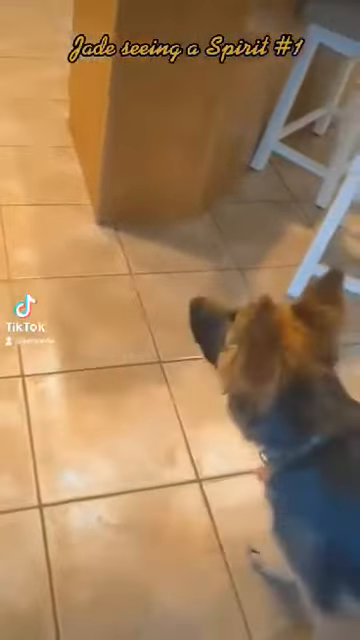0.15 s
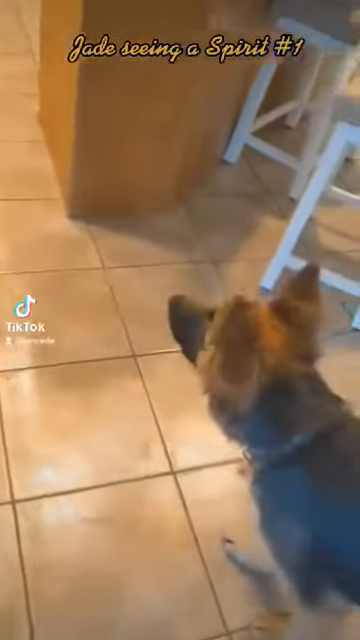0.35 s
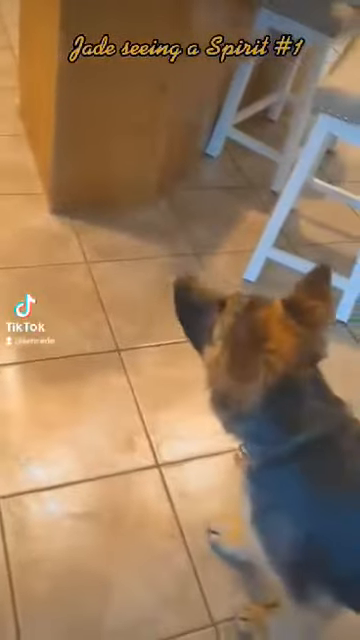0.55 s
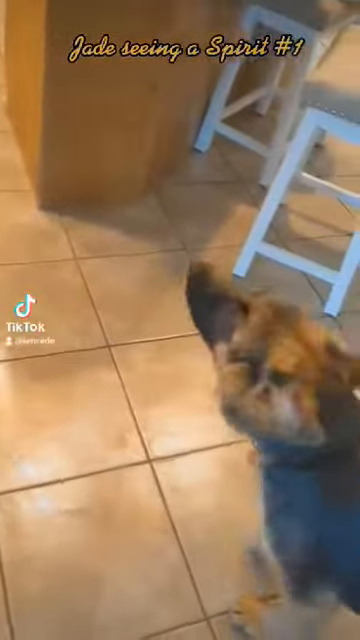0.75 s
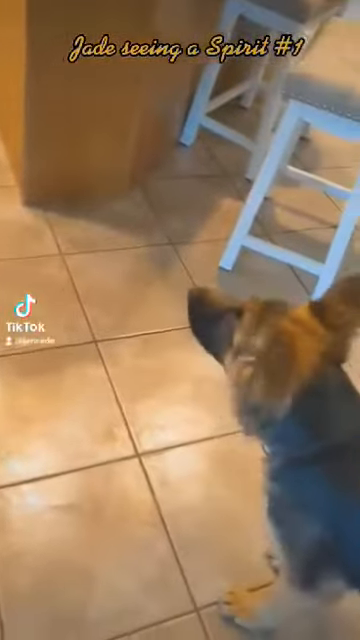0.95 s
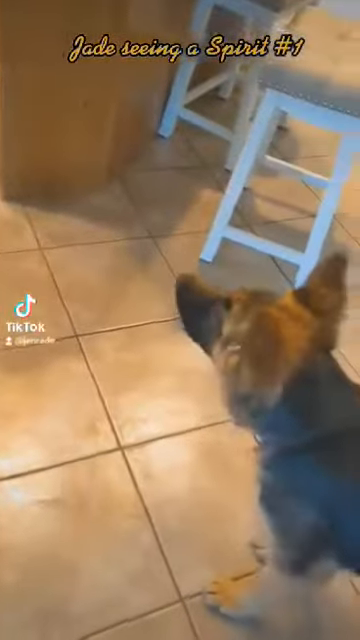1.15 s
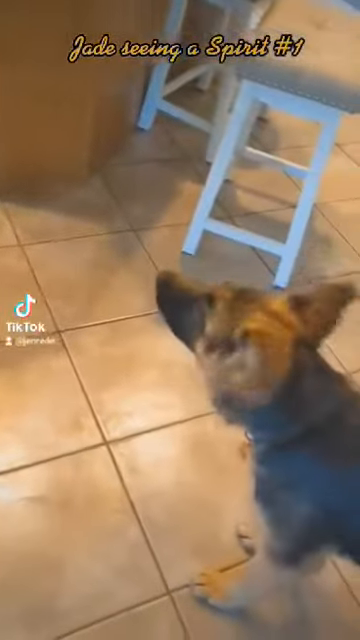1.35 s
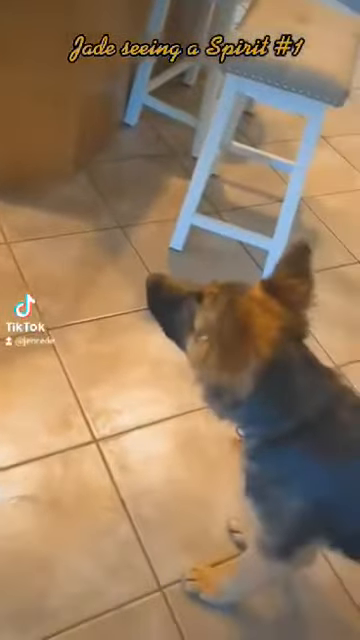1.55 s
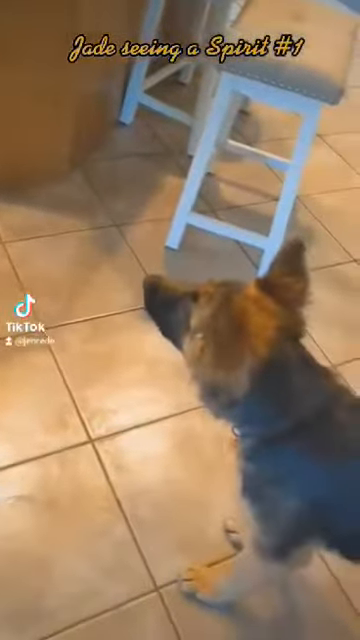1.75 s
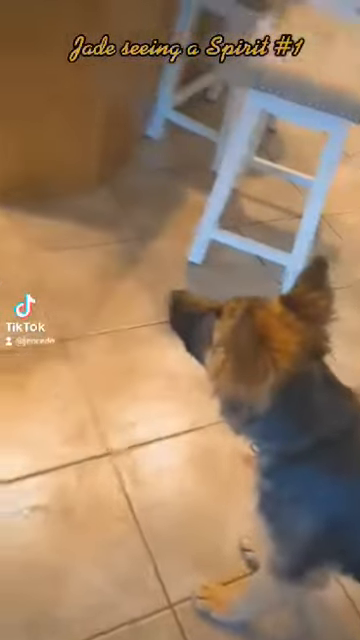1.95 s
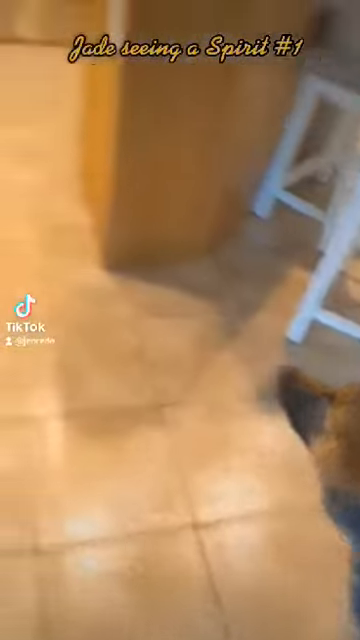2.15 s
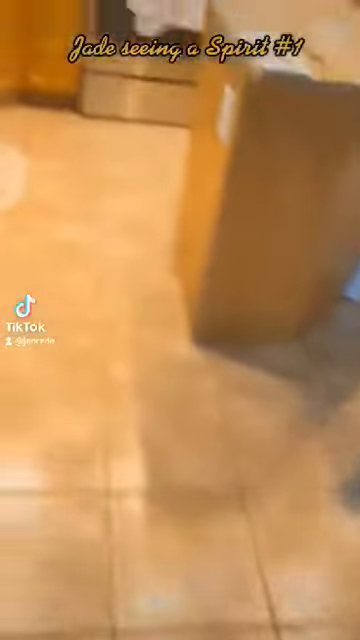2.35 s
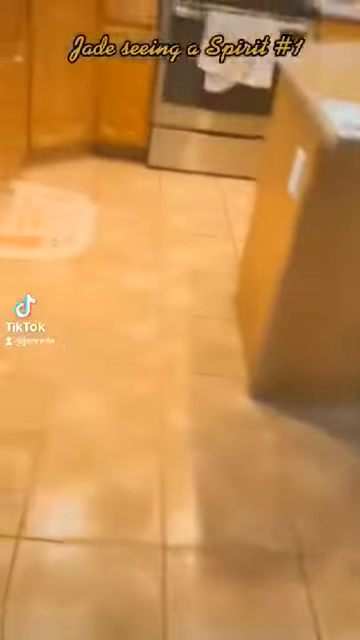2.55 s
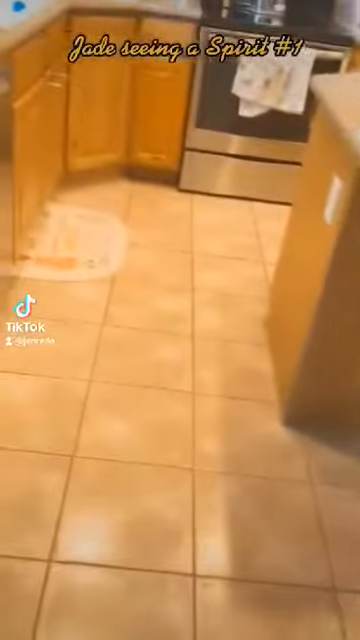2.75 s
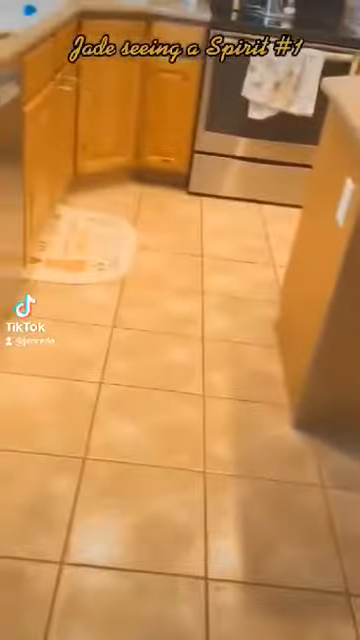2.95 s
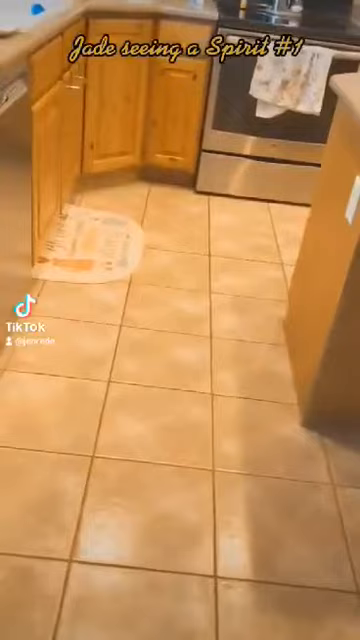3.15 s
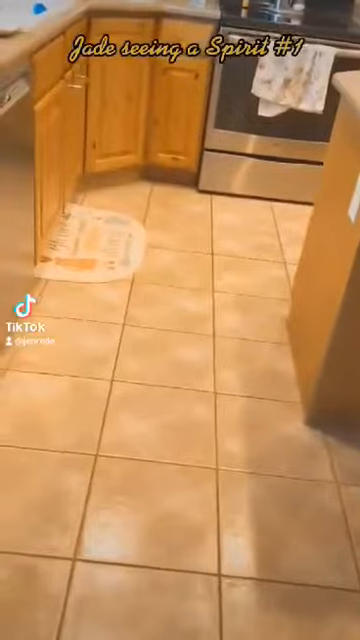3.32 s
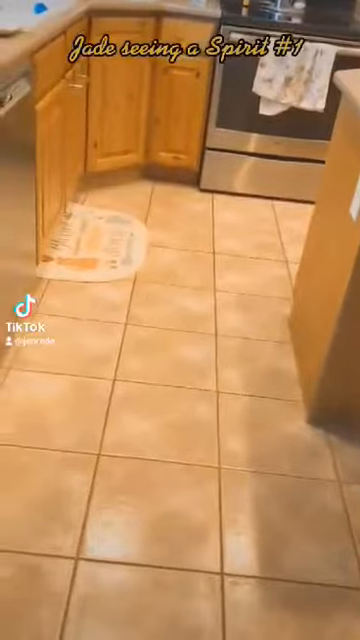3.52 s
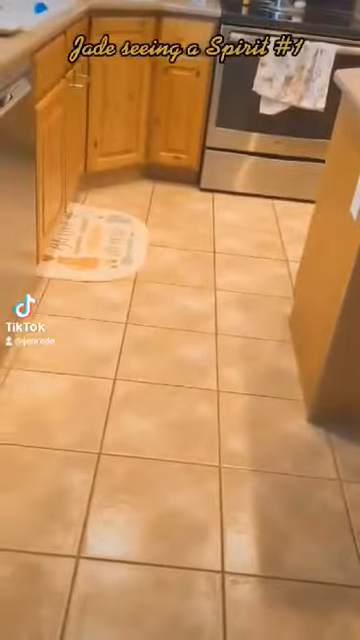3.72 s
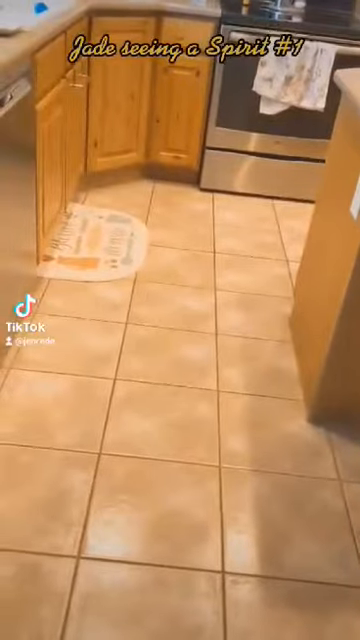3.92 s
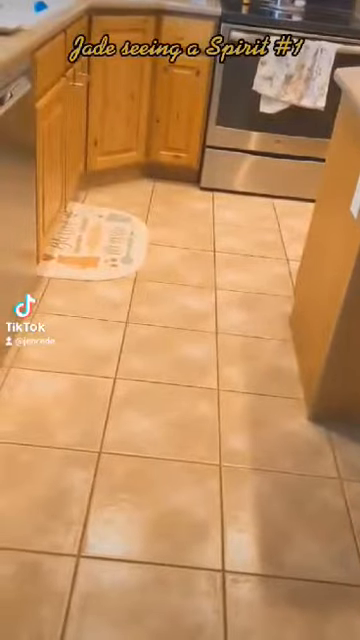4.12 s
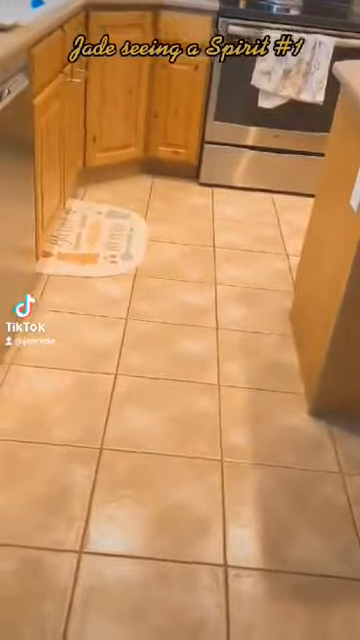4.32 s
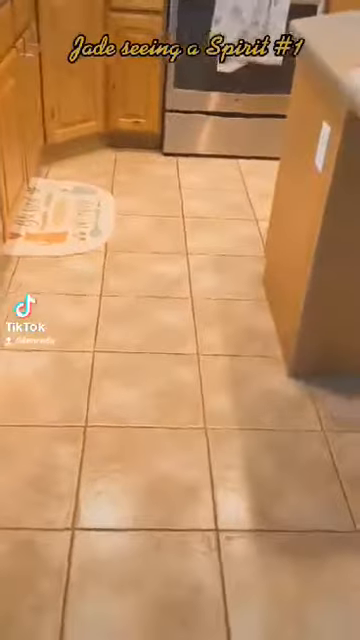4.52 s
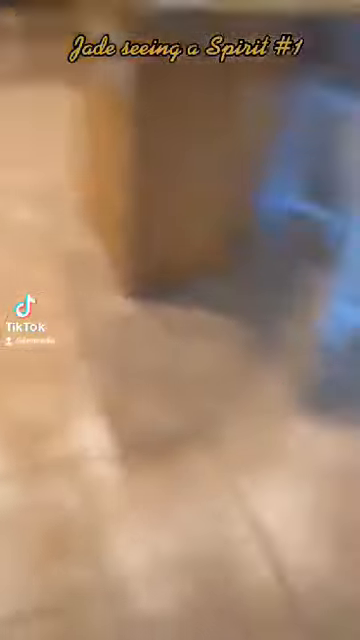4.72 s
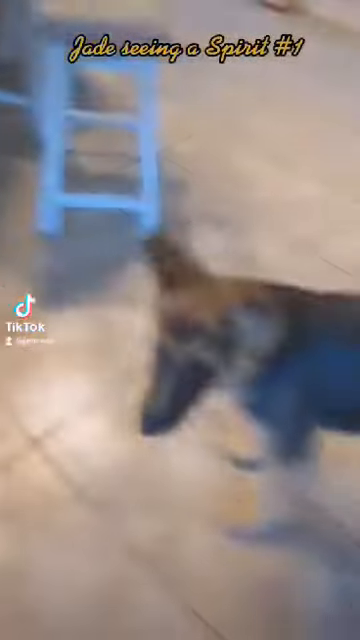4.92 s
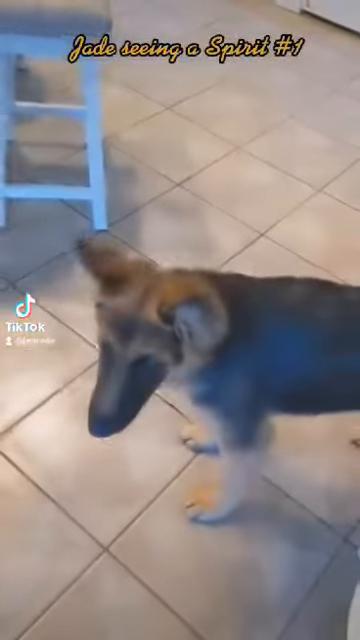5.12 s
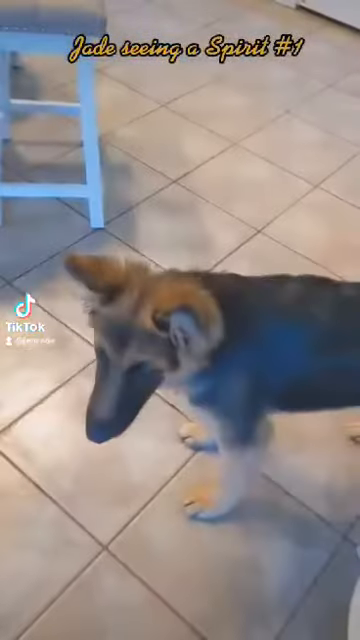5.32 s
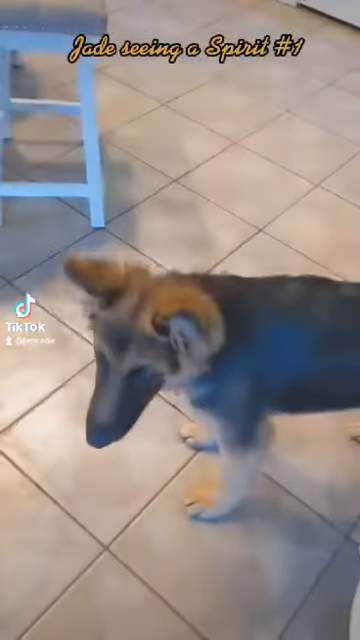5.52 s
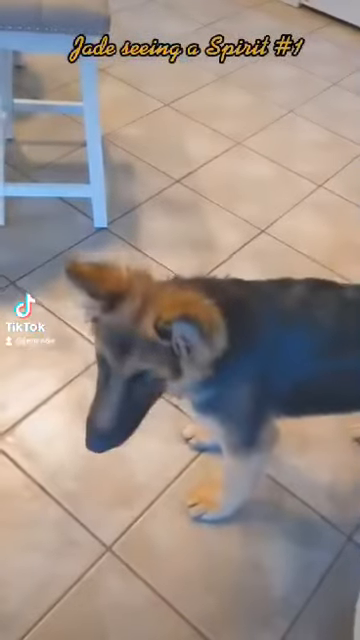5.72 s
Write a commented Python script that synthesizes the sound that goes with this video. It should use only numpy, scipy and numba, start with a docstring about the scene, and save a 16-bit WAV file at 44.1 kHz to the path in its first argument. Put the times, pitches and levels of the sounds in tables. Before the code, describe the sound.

A young shepherd dog a step from a phone microphone barks in a hard tiled kitchen. A quick double bark opens, soft paw steps follow, then come two pairs of loud barks with gruff growls trailing off. A lower bark and a closed-mouth growl follow around three seconds, then a last shrill yap after a pause. Bright echoes swell after the loud barks, then only quiet room air and a faint drone remain.

```python
"""Seven barks of a young shepherd dog, the first a double one, ring in a tiled kitchen a step from a phone.
Each bark is a sum of vocal-fold harmonics that swoops up; it is clear at the crest and rough on either side.
Growls are slower folds behind the muzzle; paws, hisses and a rustle are shaped noise over room air and a drone.
The phone's limiter ducks the loud barks and lets the echo swell back."""
import sys
import numpy as np
from scipy import signal
from scipy.fft import rfft, irfft, next_fast_len
from scipy.io import wavfile
from scipy.ndimage import uniform_filter1d, minimum_filter1d, map_coordinates
from numba import njit

SR = 44100
rng = np.random.default_rng(int(sys.argv[2]) if len(sys.argv) > 2 else 0)


def wav_record(signal):
    """Record a signal, one row per channel, as 16-bit PCM in the file named by sys.argv[1]."""
    frames = np.transpose(np.atleast_2d(signal))
    bounded = np.clip(frames, -1, 1)
    # unit amplitude maps onto the largest positive 16-bit level
    quanta = np.round(bounded * 32767).astype(np.int16)
    wavfile.write(sys.argv[1], SR, quanta)


N = 258867
LEAD_SAMPLES = SR // 8  # the first bark is already under way at time zero
T = np.arange(-LEAD_SAMPLES, N) / SR
TOP_HZ = 13300

# Barks. Each row: start in seconds, swoop in seconds, hold in seconds, die-away in seconds, top pitch in Hz,
# level in dB, mouth opening in the swoop, mouth opening at the crest (0 woof, 1 yap, more a shriller yelp),
# overtone edge in dB, roughness at the crest 0-1, treble toward the phone in dB, lead of the left port in ms.
BARKS = [ (-.075, 0.064, .04, 0.054, 494.7, -19.5, 0.59, 0.12, -2, 0.4, 0, -0.011),
         (.028, .042, .024, 0.025, 484.8, -19, 1.2, .03, 1, .33, 0.5, -0.097),
         (0.753, 0.071, 0.0093, .04, 499.3, 1, 1.02, 0.54, -3, 0.15, -1.5, 0.091),
         (1.26, .052, .004, .14, 451.7, -3, 0.25, 0.52, -2.5, 0.25, 0, -0.069),
         (2.401, .074, 0.0091, 0.045, 496.2, 3, 1.02, 0.44, 1, 0.16, -1, 0.044),
         (2.719, 0.053, .006, 0.14, 460, -3.5, 0.48, 0.28, 0.5, 0.19, -1, 0.16),
         (3.5, .042, .024, 0.051, 452.3, -4, .15, 0, 6.5, 0.34, 0, 0.1),
         (4.634, 0.034, .024, 0.019, 487.6, -8, 1.64, 1.26, -6.5, 0.075, 6, 0.19)]
# Growls that trail off a bark or wind up to the next. Each row: start in seconds, swell in seconds,
# fade in seconds, first pitch in Hz, last pitch in Hz, level at the crest in dB, lips parted 0-1, roughness 0-1.
GROWLS = [ (0.892, 0.15, .11, 152.5, 72.3, -39.5, 1, .7),
          (1.109, 0.091, 0.14, 86.6, 115.2, -31.5, 0.63, .22),
          (1.406, 0.044, .11, 172, 109.2, -31, 0.36, .4), (2.551, 0.049, 0.089, 161.4, 117, -26, 0.97, .35),
          (2.66, 0.072, 0.01, 113.3, 153, -29.5, 0.8, .15), (2.818, 0.09, 0.14, 204.4, 100, -33, 0.95, .4),
          (4.548, .04, .045, 109.5, 166, -38.5, 0.93, 1),
          (4.596, 0.0342, 0.0241, 173.5, 411, -24, 0.98, 0.37)]
# Long growl with the mouth shut. Each row: time in seconds, pitch in Hz, level in dB before HUM_TRIM_DB.
HUM = [(2.97, 100.3, -33), (2.994, 103.5, -31), (3.024, 97.1, -33), (3.164, 99.7, -28), (3.214, 106, -27.5),
       (3.278, 106, -33.5), (3.398, 102.8, -27), (3.452, 102, -29.5), (3.485, 105.5, -35)]
# Throat of a bark, lips nearly shut, then jaws wide. Each row: frequency in Hz, relative gain in dB.
WOOF_THROAT = [(100, -14.5), (250, 15.5), (440, -2), (650, -10), (950, -13), (1350, -21), (1850, -23.5),
               (2300, -42), (3000, -42), (4300, -55.5), (6500, -39), (9500, -56.5), (13000, -61.5)]
YAP_THROAT = [(100, -30), (250, -5.5), (440, -6), (720, -2.5), (880, -7.5), (1050, 0), (1350, -11.5),
              (1850, -10), (2300, -24), (3000, -31), (4300, -44), (6500, -28.5), (9500, -47.5),
              (13000, -52)]
# Throat of a growl, muzzle closed, then lips parted. Each row: frequency in Hz, relative gain in dB.
MUZZLE = [(60, -20.5), (104, -19.5), (140, -10), (208, 9), (305, -6.5), (420, -27), (570, -42.5),
          (860, -28), (1150, -48), (2500, -53.5), (6000, -72)]
SNARL = [(60, -17.5), (95, -6.5), (140, -4), (205, -10), (295, 0), (430, -11.5), (600, -16.5), (900, -20.5),
         (1400, -25.5), (2500, -51.5), (6000, -62)]
# Air torn at the folds in a bark, then in a growl. Each row: frequency in Hz, relative density in dB per Hz.
RASP = [(30, -62.5), (130, -25), (350, -18), (600, -7.5), (850, 8.5), (1300, 0), (1850, -0.5), (2300, -18),
        (3500, -19), (4400, -39), (5200, -22), (7200, -18), (8400, -26.5), (9500, -38.5), (12800, -37)]
GRUFF = [(30, -49.5), (90, -13.5), (200, 0), (420, -1), (650, -4.5), (900, -14), (1500, -26.5),
         (6000, -43.5)]
# Paws on the tiles. Each row: start in seconds, pad thud in dB and claw in dB (noise before its envelope),
# claw slide (decay time) in seconds.
STEPS = [(.28, -58.5, -51, 0.022), (.485, -42, -74, .01), (0.537, -47, -36, 0.0064),
         (0.669, -38, -48, 0.0063), (3.186, -63.5, -59.5, 0.047), (3.921, -68.5, -60, 0.032),
         (4.073, -65, -65, 0.019)]
# Air hissing through the muzzle as a bark winds up. Each row: start in seconds, end in seconds, end level in dB.
PUFFS = [(0.626, 0.733, -54.5), (2.279, 2.403, -44.5), (4.609, 4.666, -41.5)]
# Spectrum of that hiss. Each row: frequency in Hz, relative density in dB per Hz.
PUFF_SPECTRUM = [(40, -43.5), (200, 2), (900, 0), (2000, 2), (3200, 0), (5000, -2), (8000, -3),
                 (12500, -11)]
# Soft rustle as the dog settles. One row: start in seconds, end in seconds, peak level in dB.
RUSTLE_SWELL = (5.07, 5.43, -69)
# Spectrum of the rustle. Each row: frequency in Hz, relative density in dB per Hz.
RUSTLE_SPECTRUM = [(150, -1), (700, -2), (1300, 1), (2000, -9), (3300, -11), (5000, -26), (12000, -30)]
# Decay of the kitchen echo. Each row: frequency in Hz, t60 in seconds.
KITCHEN_T60 = [(150, 0.76), (480, 0.55), (1000, 0.5743), (2000, 0.6219), (5000, 0.5066), (11000, 0.42)]
# Colour of the kitchen echo. Each row: frequency in Hz, echo in dB.
KITCHEN_COLOUR = [(100, -6.5), (220, -9), (460, -4), (950, 0), (1600, -6), (3200, -2.5), (6500, -4.5),
                  (12000, -7.5)]
# Room air. Each row: frequency in Hz, relative density in dB per Hz.
AIR_SPECTRUM = [(15, -61), (25, -34.5), (36, -16.5), (59, -6), (203, -14.5), (325, -13), (400, -29.5),
                (433, -15), (625, -21.5), (1030, -23.5), (1730, -27.5), (2310, -33.5), (13000, -45)]
# Low appliance drone. Each row: time in seconds, level in dB.
DRONE_LEVEL = [(0, -59), (.5, -62.5), (1.9, -64.5), (2.3, -65.5), (4.1, -72), (4.5, -69), (5.7, -71.5),
               (5.8, -68), (5.85, -54.5)]

START_HZ, ONSET_DB, RELEASE_DB, SAG_S = 184.5, -34, -34.5, .15
SWELL_POWER, SWOOP_POWER = 2.196, 1.75  # the level arrives sooner than the pitch
RELEASE_POWER = 0.79  # the level drops fastest just after the crest
JAW_TURN = .66  # share of the swoop at which the jaws move
JAW_MOVE_S, SLACK_MOUTH = 0.012, 0.29  # the slack opening is that of a dying bark
BREAK_S = 0.027  # time for the voice to break once the crest is over
BREAK_DB = -17.5  # the voice is fully hoarse this far under its crest and below
ONSET_ROUGH, DYING_ROUGH = .75, .9
RASP_DB, GRUFF_DB = -2.5, 0.5  # relative to the tone, at full roughness
GROWL_ENDS_DB = -20  # start and end of a growl, under its crest
HUM_TRIM_DB, HUM_PARTED, HUM_ROUGH = 0.5, .1, 0.02
AIR_DB = -64


def bark(row, jitter=.07, shimmer=0.097, open_rasp_db=3):
    """The jaws blend a woof into a yap; roughness shakes pitch and strength and tears the air."""
    (start, swoop_s, hold_s, die_s, top_hz, db, swoop_mouth, crest_mouth,
     edge_db, crest_rough, facing_db, lead_ms) = row
    t, fade = span(start, start + swoop_s + hold_s + die_s)
    hz, effort_db, mouth, rough = bark_gesture(
        t - start, swoop_s, hold_s, die_s, top_hz, swoop_mouth, crest_mouth, crest_rough)

    def throat_db(f):
        """The blended throat, with the overtones above 1 kHz raised or lowered."""
        blended = (1 - mouth) * at(WOOF_THROAT, f) + mouth * at(YAP_THROAT, f)
        return blended + edge_db * np.clip((f - 1000) / 350, 0, 1)

    shaken_hz = hz * (1 + jitter * rough * wobble(t, 350))
    tone, gate = folds(shaken_hz, throat_db, count=30)
    tone = tone * (1 + shimmer * rough * wobble(t, 300))
    rasp = undb(RASP_DB + open_rasp_db * mouth) * rough * gate * noise(RASP, len(t))
    voice = undb(db + effort_db) * (tone + rasp)
    return t[0], fade * scatter(voice, facing_db, lead_ms)


def bark_gesture(age, swoop_s, hold_s, die_s, top_hz, swoop_mouth, crest_mouth, crest_rough):
    """Pitch, effort, mouth and roughness of one bark: the voice is clearest at full effort."""
    to_go = np.clip(1 - age / swoop_s, 0, 1)
    dying_s = np.maximum(age - swoop_s - hold_s, 0)
    sag = np.minimum(dying_s / SAG_S, 1) ** 2
    hz = top_hz - (top_hz - START_HZ) * (to_go ** SWOOP_POWER + sag)
    swell_db = ONSET_DB * to_go ** SWELL_POWER
    effort_db = swell_db + RELEASE_DB * (dying_s / die_s) ** RELEASE_POWER
    mouth = blend(swoop_mouth, crest_mouth, (age - JAW_TURN * swoop_s) / JAW_MOVE_S + .5)
    mouth = blend(mouth, SLACK_MOUTH, dying_s / BREAK_S)
    rough = blend(crest_rough, ONSET_ROUGH, swell_db / BREAK_DB)
    rough = blend(rough, DYING_ROUGH, dying_s / BREAK_S)
    return hz, effort_db, np.clip(mouth, 0, 1.7), np.clip(rough, .05, 1)


def folds(hz, shape_db, count):
    """Vocal-fold harmonics, weighted by the throat, and an air gate that opens wider once a cycle."""
    phase = 2 * np.pi * np.cumsum(hz) / SR
    k = np.arange(1, count + 1)[:, None]
    gain = undb(shape_db(k * hz)) * (k * hz < TOP_HZ)
    lag = rng.uniform(0, 2 * np.pi, (count, 1))
    harmonics = np.sum(gain * np.cos(k * phase - lag), axis=0)
    rms = np.sqrt(np.sum(gain ** 2, axis=0) / 2)
    return harmonics / rms, unit(1 + 0.51 * np.cos(phase))


def scatter(x, facing_db, lead_ms, split_hz=2150, spread_s=0.002, apart=0.84):
    """The way to the two ports: a short random smear of the treble, partly shared by both, drawn per bark."""
    low, high = (signal.sosfilt(signal.butter(6, split_hz, kind, fs=SR, output="sos"), x)
                 for kind in ("low", "high"))
    t = np.arange(SR // 80) / SR
    shared = rng.standard_normal(len(t))
    smear = (shared + apart * rng.standard_normal((2, len(t)))) * np.exp(-t / spread_s)
    smear = smear / np.linalg.norm(smear, axis=1, keepdims=True)
    smeared = signal.fftconvolve(high[None], smear, axes=1)[:, :len(x)]
    left, right = low + undb(facing_db) * smeared
    i = np.arange(len(x))
    lead_samples = lead_ms * SR / 1000
    return np.array([left, np.interp(i - lead_samples, i, right)])


def growl(t, fade, hz, db, parted, rough, jitter=0.15, shimmer=0.93):
    """Slow folds behind the muzzle: a hum with the lips shut, a gruff rattle as they part."""
    parted, rough = np.clip(parted, 0, 1), np.clip(rough, 0, 1)

    def throat_db(f):
        """The closed muzzle blended with the parted lips."""
        return (1 - parted) * at(MUZZLE, f) + parted * at(SNARL, f)

    shaken_hz = hz * (1 + jitter * rough * wobble(t, 110))
    tone, gate = folds(shaken_hz, throat_db, count=24)
    tone = tone * (1 + shimmer * rough * wobble(t, 90))
    gruff = undb(GRUFF_DB) * rough * gate * noise(GRUFF, len(t))
    return t[0], fade * undb(db) * (tone + gruff)


def growl_gesture(start, swell_s, fade_s, first_hz, last_hz, db):
    """Pitch and level through a short growl: one glide, one swell."""
    t, fade = span(start, start + swell_s + fade_s)
    crest = start + swell_s
    from_crest = np.maximum((crest - t) / swell_s, (t - crest) / fade_s)
    return t, fade, np.geomspace(first_hz, last_hz, len(t)), db + GROWL_ENDS_DB * from_crest


def puff(start, end, db):
    """Breath noise that swells toward the bark."""
    t, fade, swell_db = controls([(start, -22), ((start + end) / 2, -4), (end, 0)])
    return undb(db + swell_db) * fade * noise(PUFF_SPECTRUM, len(t))


def step(thud_db, claw_db, slide_s, thud_s=0.036):
    """The pad thuds softly; the claws tick and slide a little on the glaze."""
    t = np.arange(SR // 4) / SR
    # (Hz, relative dB per Hz)
    pad = noise([(50, -28.0), (130, -15.0), (190, 7.5), (240, -8.0), (320, -23.0), (550, -18.5),
                 (1200, -27.0), (4000, -63)], len(t))
    claw = noise([(300, -14.0), (1200, -7.5), (2100, 6.5), (3500, -0.5), (6500, 3.0), (12000, -6)], len(t))
    thud = undb(thud_db) * pad * np.exp(-t / thud_s) * (1 - np.exp(-t / 0.0033))
    tick = undb(claw_db) * claw * np.exp(-t / slide_s) * (1 - np.exp(-t / 0.0053))
    return thud + tick


def rustle(start, end, db):
    """A brush of noise that swells and fades."""
    t, fade = span(start, end)
    return undb(db) * np.sin(np.pi * (t - start) / (end - start)) * noise(RUSTLE_SPECTRUM, len(t))


def kitchen(x, first_s=0.01, build_s=0.0013):
    """Tiles and cabinets return a dense echo; each band dies at its own rate."""
    t = np.arange(SR) / SR
    f = np.fft.rfftfreq(SR, 1 / SR)
    centres_hz = np.geomspace(125, 16000, 8)
    spectra = rfft(rng.standard_normal((2, SR))) * undb(at(KITCHEN_COLOUR, f))
    build = np.clip((t - first_s) / build_s, 0, 1)
    echo = 0
    for share, hz in zip(np.eye(len(centres_hz)), centres_hz):
        decay = np.exp(-np.log(1000) * t / at(KITCHEN_T60, hz)) * build
        band = irfft(spectra * at(np.c_[centres_hz, share], f), SR)
        echo = echo + band * decay / np.linalg.norm(decay)
    return signal.fftconvolve(x[None], two_ports(*echo), axes=1)[:, :len(x)]


def house():
    """Quiet, slightly wavering room air over a low drone of narrow noise."""
    air = two_ports(noise(AIR_SPECTRUM, len(T)), noise(AIR_SPECTRUM, len(T)))
    air = air * undb(AIR_DB + wobble(T, 7.2))
    # (Hz, relative dB per Hz)
    drone = noise([(20, -28.5), (45, -31.0), (57, 3.0), (70, -14.5), (120, -19.5), (250, -53.0),
                   (1000, -90.5)], len(T))
    return air + drone * undb(np.interp(T, *np.transpose(DRONE_LEVEL)))


def two_ports(mid, side, apart_hz=750):
    """Diffuse sound at two close ports: alike in the bass, unrelated in the treble."""
    wide = signal.sosfilt(signal.butter(2, apart_hz / 2, "high", fs=SR, output="sos"), side)
    return (mid + wide * np.array([[1], [-1]])) / np.sqrt(2)


def undb(db):
    """Decibels to gain."""
    return 10 ** (np.asarray(db) / 20)


def unit(x):
    """Scale to rms 1."""
    return x / np.sqrt(np.mean(x ** 2) + 1e-18)


def blend(a, b, share):
    """Move from a to b as the share goes from 0 to 1."""
    return a + (b - a) * np.clip(share, 0, 1)


def at(points, hz):
    """Read (Hz, value) points on a log-frequency axis."""
    f, value = np.transpose(points)
    return np.interp(np.log(np.maximum(hz, 1)), np.log(f), value)


def colour(x, points):
    """Filter by a (Hz, dB) spectrum."""
    size = next_fast_len(x.shape[-1] + 2048)
    gain = undb(at(points, np.fft.rfftfreq(size, 1 / SR)))
    return irfft(rfft(x, size) * gain, size)[..., :x.shape[-1]]


def noise(points, size):
    """Noise of rms 1 with a (Hz, dB) spectrum."""
    return unit(colour(rng.standard_normal(size), points))


def wobble(t, rate_hz):
    """Smooth random motion with a spread near 1."""
    knots = rng.standard_normal(int((t[-1] - t[0]) * rate_hz) + 4)
    return map_coordinates(knots, [(t - t[0]) * rate_hz], order=3, mode="nearest")


def span(start, end):
    """The times from start to end and a short fade at both ends."""
    t = T[(T >= start) & (T <= end)]
    return t, np.clip(np.minimum(t - t[0], t[-1] - t) / .004, 0, 1)


def controls(rows):
    """The times that a table spans, a short fade at both ends, and its columns as curves."""
    s, *columns = np.transpose(rows)
    t, fade = span(s[0], s[-1])
    return [t, fade] + [np.interp(t, s, c) for c in columns]


def add(out, start, x):
    """Mix x into both channels at a time in seconds."""
    i = max(int(round(start * SR)) + LEAD_SAMPLES, 0)
    out[:, i:i + x.shape[-1]] += x[..., :len(T) - i]


def scene():
    """The dog is heard directly and through the room."""
    dog = np.zeros((2, len(T)))
    for row in BARKS:
        add(dog, *bark(row))
    for *gesture, parted, rough in GROWLS:
        add(dog, *growl(*growl_gesture(*gesture), parted, rough))
    t, fade, hum_hz, hum_db = controls(HUM)
    add(dog, *growl(t, fade, hum_hz, hum_db + HUM_TRIM_DB, HUM_PARTED, HUM_ROUGH))
    for start, thud_db, claw_db, slide_s in STEPS:
        add(dog, start, step(thud_db, claw_db, slide_s))
    for start, end, db in PUFFS:
        add(dog, start, puff(start, end, db))
    add(dog, RUSTLE_SWELL[0], rustle(*RUSTLE_SWELL))
    return (dog + kitchen(dog[0]) + house())[:, LEAD_SAMPLES:]


@njit
def hold(over_db, release_db):
    """Follow the overshoot at once and let go of it by a fixed step in dB per sample."""
    out, cut = np.empty(len(over_db)), 0.
    for i in range(len(over_db)):
        cut = max(over_db[i], cut - release_db)
        out[i] = cut
    return out


def record(dry, ceiling_db=-2.43, release_db_per_s=62):
    """A look-ahead limiter ducks the loud barks and recovers during their echo; the top is cut."""
    peak_db = 20 * np.log10(np.abs(dry).max(axis=0) + 1e-9)
    over_db = np.maximum(peak_db - ceiling_db, 0)
    gain = undb(-hold(over_db, release_db_per_s / SR))
    gain = uniform_filter1d(minimum_filter1d(gain, size=180), size=180)  # size in samples
    top_cut = signal.ellip(10, .2, 80, TOP_HZ, fs=SR, output="sos")
    return signal.sosfilt(top_cut, dry * gain)


dry = scene()
out = record(dry)
wav_record(out)
```